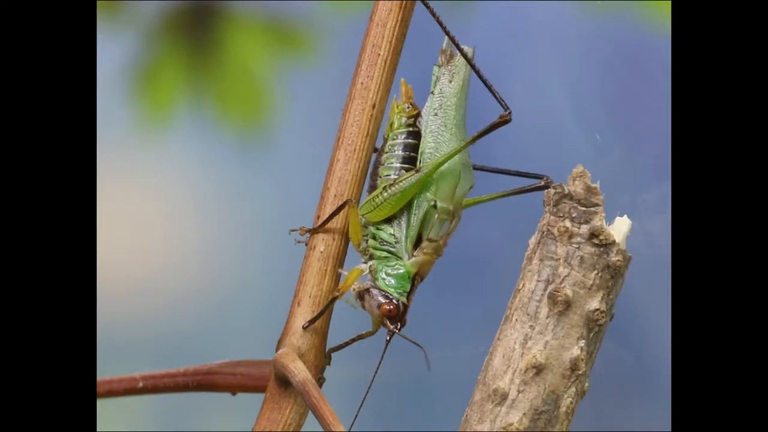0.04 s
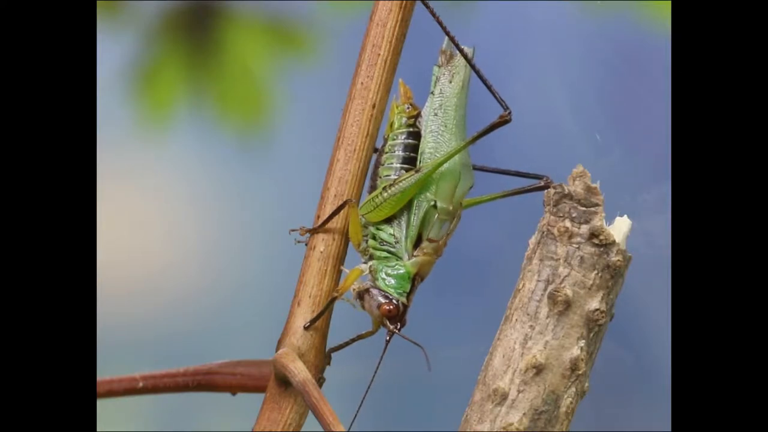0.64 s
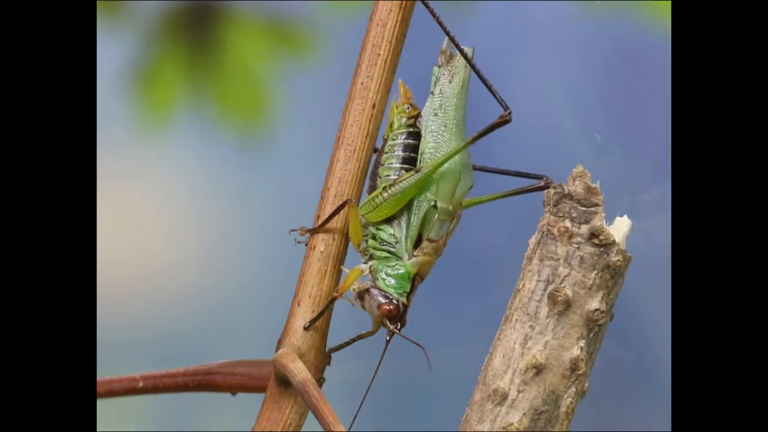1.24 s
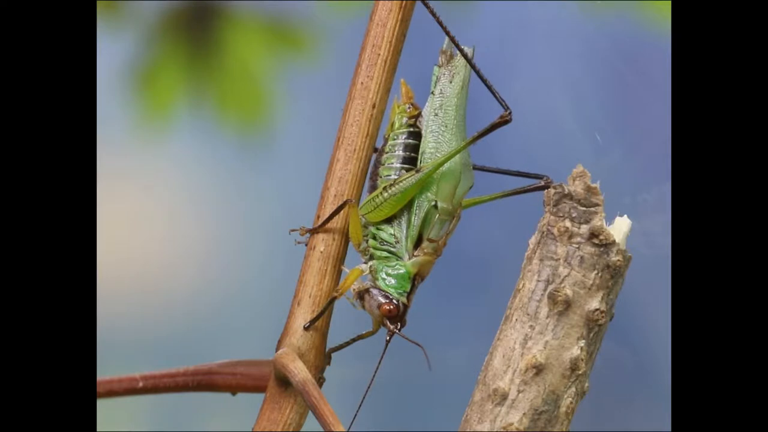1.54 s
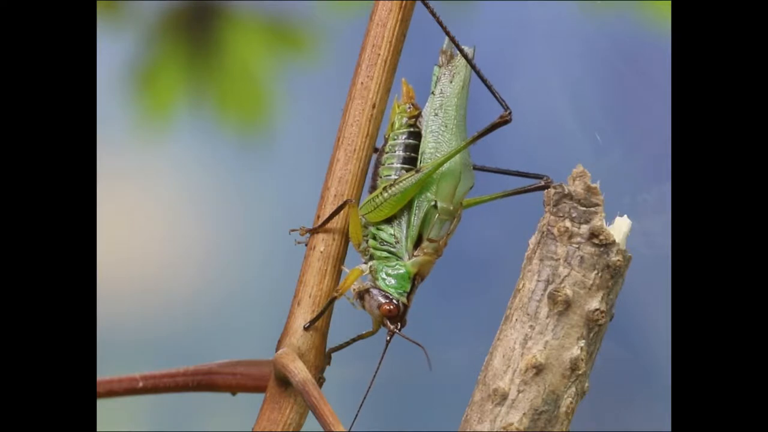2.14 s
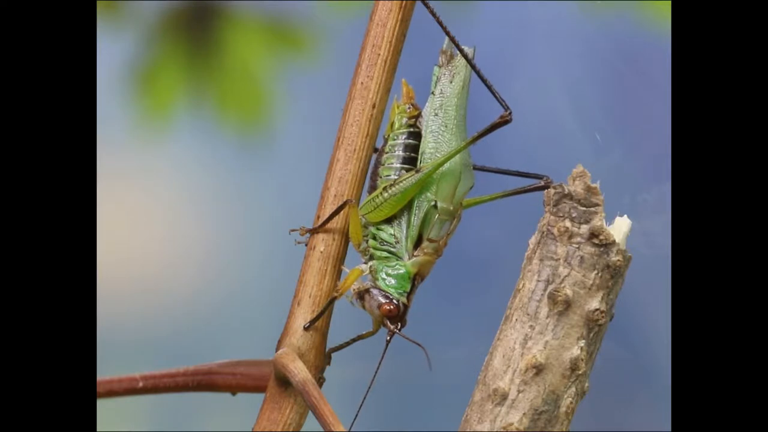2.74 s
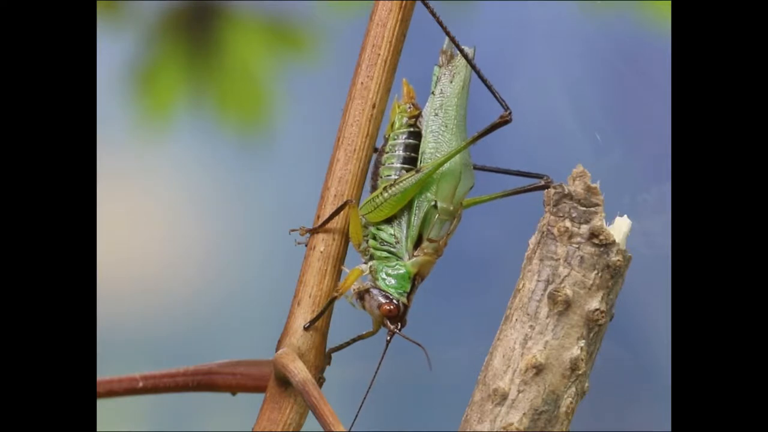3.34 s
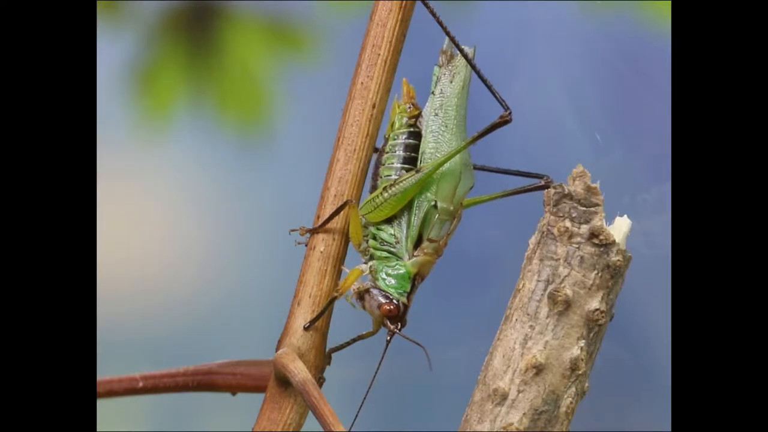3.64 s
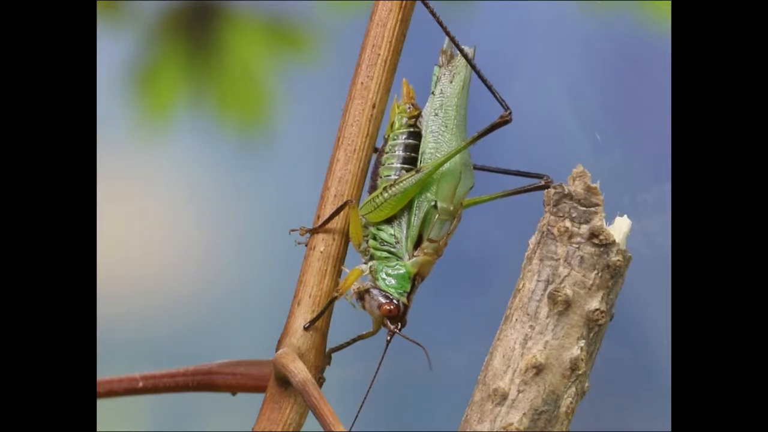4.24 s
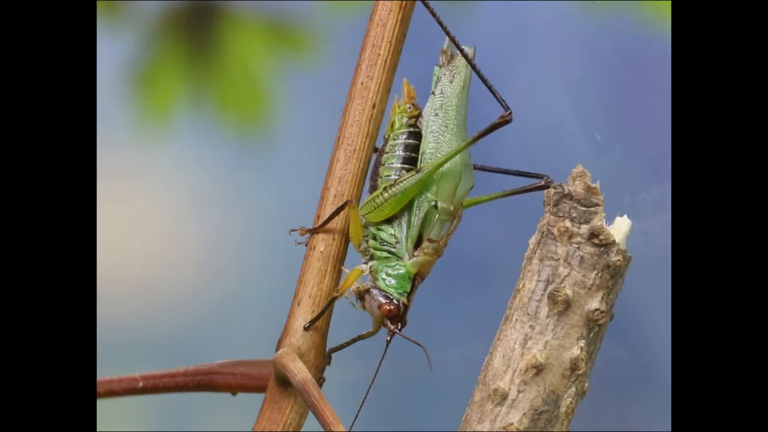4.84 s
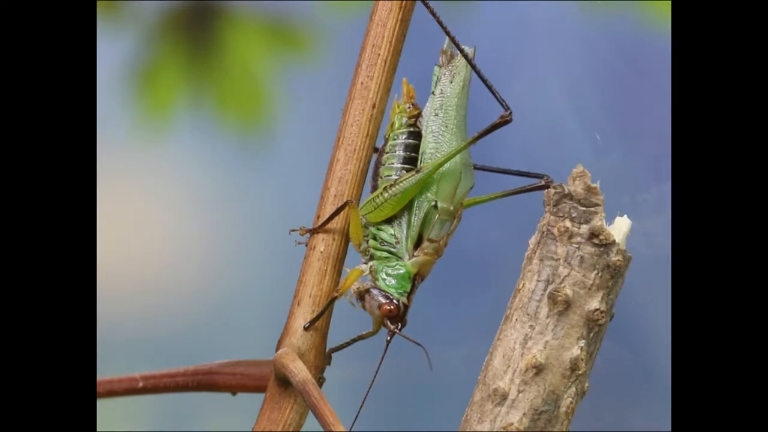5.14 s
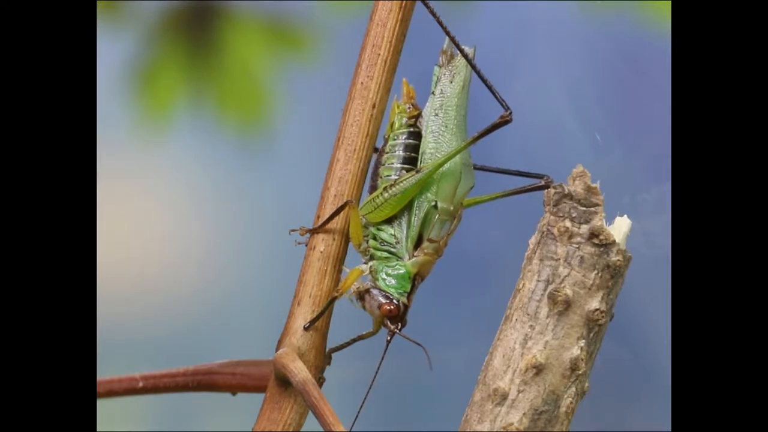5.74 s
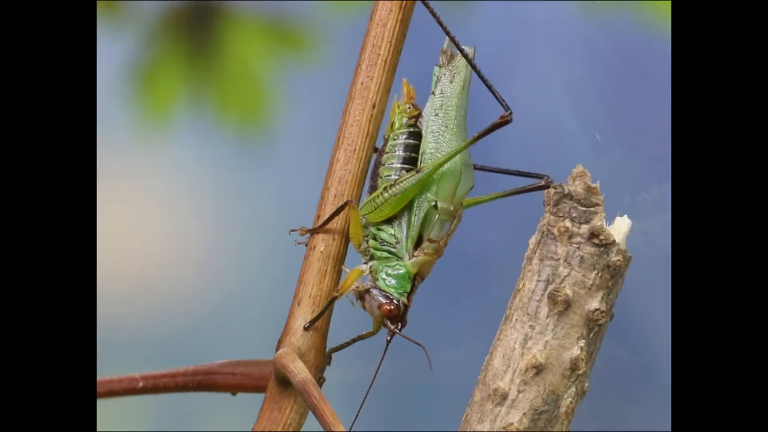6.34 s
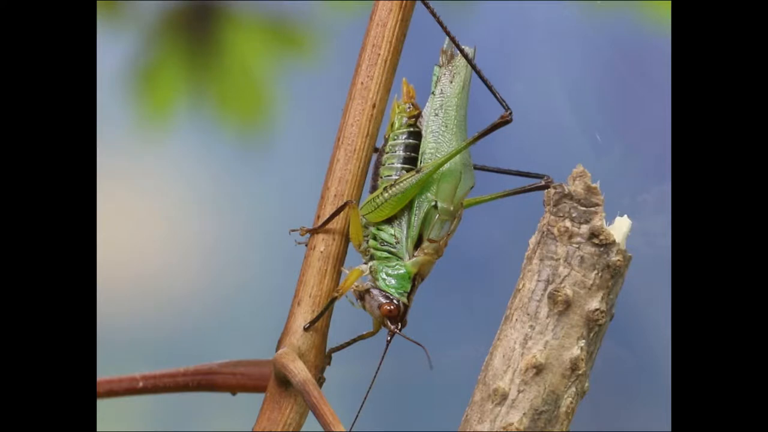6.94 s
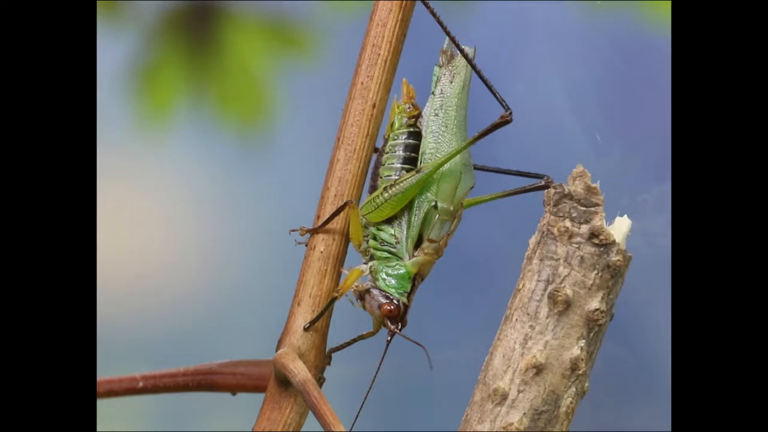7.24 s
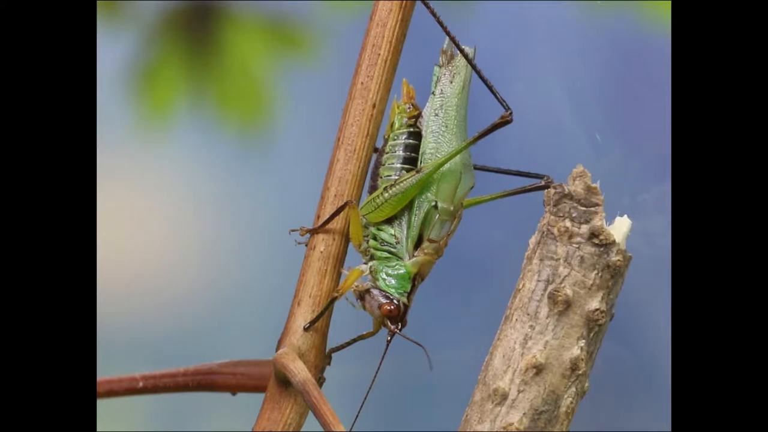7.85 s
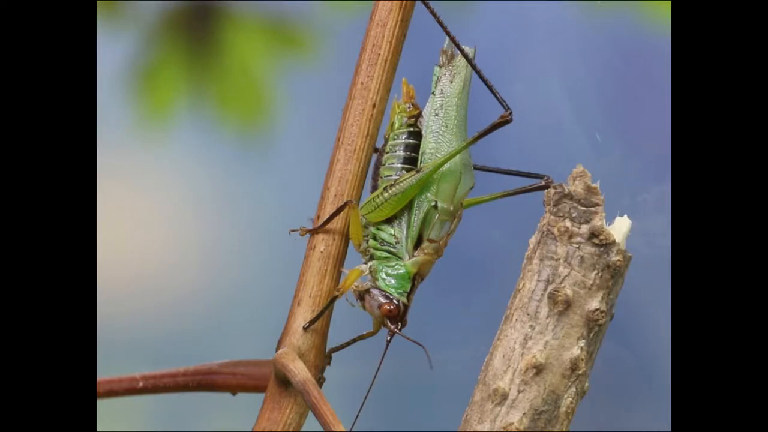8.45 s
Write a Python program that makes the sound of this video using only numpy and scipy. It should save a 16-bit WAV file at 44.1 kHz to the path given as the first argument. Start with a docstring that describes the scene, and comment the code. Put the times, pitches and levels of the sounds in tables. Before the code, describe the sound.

A close katydid makes a few sharp, irregular ticks over low outdoor hiss, then a fainter insect buzzes very high.

```python
"""Katydid ticks by stridulation

A katydid close by makes sharp ticks: in each quick wing stroke a scraper jumps over about ten file
teeth, exciting the wing's resonances. Hard surfaces nearby give each tick a short tail. Later a
fainter insect sings very high, short zips and two long buzzes. Steady hiss, rumble and a low machine
hum lie beneath, with brief low drones, a soft swish, a little rustling and one small knock."""
import sys
import numpy as np
from scipy import signal
from scipy.fft import rfft, irfft
from scipy.io import wavfile
from scipy.ndimage import uniform_filter1d

SR = 44100
rng = np.random.default_rng(int(sys.argv[2]) if len(sys.argv) > 2 else 0)


def unload_audio(sound):
    """Save the sound as a 16-bit wav file, at the path given as the first command line argument."""
    columns = np.transpose(np.atleast_2d(sound))
    # keep every value between -1 and 1, then stretch to whole-number steps
    steps = np.round(np.clip(columns, -1, 1) * 32767)
    wavfile.write(sys.argv[1], SR, steps.astype(np.int16))


N = 378819
T = np.arange(N) / SR


def amp(db):
    """Amplitude ratio of a level in decibels."""
    return 10 ** (np.asarray(db) / 20)


def unit(x):
    """Normalisation to rms 1."""
    return x / np.sqrt(np.mean(x ** 2) + 1e-20)


def read(points, hz):
    """Interpolation of a (frequency, value) table on a log-frequency axis."""
    f, value = np.transpose(points)
    return np.interp(np.log(hz + 1), np.log(f + 1), value)


def add(mix, s, sound):
    """Superposition of a sound at time s, which may lie before the start."""
    at = round(s * SR)
    sound = sound[max(-at, 0):]
    part = mix[max(at, 0):][:len(sound)]
    part += sound[:len(part)]


def noise(colour):
    """Spectral shaping of white noise, at rms 1."""
    gain = amp(read(colour, np.fft.rfftfreq(N, 1 / SR)))
    return unit(irfft(rfft(rng.standard_normal(N)) * gain, N))


def drift(seconds):
    """Random fluctuation of rms 1 with the given correlation time."""
    return unit(uniform_filter1d(rng.standard_normal(N), max(round(seconds * SR), 1)))


def swell(s, db, length):
    """Gaussian envelope that peaks at time s."""
    return amp(db) * np.exp(-(2 * (T - s) / length) ** 2)


# modes of the wing and its perch: f/Hz, width/Hz, relative level/dB
WING_MODES = [(4190, 340, -26), (5210, 190, -17.5), (5950, 150, -21), (6650, 200, -8.5), (7530, 610, -7.5),
              (8250, 220, -2), (9200, 390, -2), (9840, 300, -2), (10480, 410, -0.5), (11130, 450, 1.5),
              (11840, 350, 1), (12330, 360, 3.5), (13100, 400, 5), (14040, 250, -6), (14800, 300, -2),
              (15200, 400, -8)]
# radiation of the small wing, poor at low frequencies: f/Hz, gain/dB
WING_RADIATION = [(1000, -12), (2500, -0.5), (3300, -8), (4500, -9.5), (5700, -5), (6150, -6.5),
                  (6450, -2.5), (16000, 1.5)]


def wing(snap, tuning):
    """Impulse excitation: a snap is brief enough to strike all the wing's modes about equally."""
    hz, blow = np.fft.rfftfreq(len(snap), 1 / SR), rfft(snap)
    blow = blow / (abs(blow) + 1e-9) ** .75  # nearly flat spectrum
    power = sum(amp(db) ** 2 / (1 + (2 * (hz - tuning * centre) / width) ** 2) ** 1.4
                for centre, width, db in WING_MODES)
    log_gain = np.log(np.sqrt(power) * amp(read(WING_RADIATION, hz)))
    # minimum phase: the ringing follows the blow
    phase = -signal.hilbert(np.r_[log_gain, log_gain[-2:0:-1]]).imag[:len(hz)]
    return irfft(blow * np.exp(log_gain + 1j * phase))


def tick(length, tooth_hz, pitch, jitter=.11, uneven_db=0.6, fade_db=2.7, hardest=0.4,
         flex=0.01, slowing=.3, first_db=-2, size=4096):
    """Stridulation: the scraper catches lightly, then snaps over the teeth ever more slowly."""
    slip, force, bend = rng.standard_normal((40, 3)).T
    teeth = np.arange(len(slip))
    way = (teeth + jitter * slip * (teeth > 0)) / (tooth_hz * length)  # share of the file passed
    onsets = length * way * (1 + slowing * (way - 1))
    force_db = uneven_db * force - fade_db * (2 * (way - hardest)) ** 2 + first_db * (teeth == 0)
    tunings = pitch + flex * bend  # flexing detunes the wing
    t = np.arange(size) / SR
    # the scraper rattles for under a millisecond as it lands
    snaps = rng.standard_normal((len(slip), size)) * np.exp(-((t - .0009) / .00036) ** 4)
    stroke = np.zeros(size // 2)
    for s, db, snap, tuning in zip(onsets, force_db, snaps, tunings):
        if s < length:
            add(stroke, s, unit(wing(snap, tuning)) * amp(db))
    return stroke / np.sqrt(np.sum(stroke ** 2) / (length * SR))


# echoes from nearby surfaces: delay/s, gain/dB
ECHO_PATHS = [(.0034, -7.5), (.0062, -7.5), (.0095, -21), (.0128, -18), (.0165, -16), (.0195, -23.5)]


def reflections(scatter_db, decay_s):
    """Early reflection: an impulse response of direct sound, fine scatter and single echoes."""
    t = np.arange(SR // 10) / SR
    scatter = rng.standard_normal(len(t)) * np.exp(-t / decay_s)
    response = amp(scatter_db) * scatter / np.linalg.norm(scatter)
    response[0] += 1
    for delay, db in ECHO_PATHS:
        response[round(delay * SR)] += amp(db)
    return response


# spectrum of the diffuse echoes: f/Hz, relative level/dB
TAIL_SPECTRUM = [(3000, -58), (5800, -10.5), (6600, -6.5), (7400, -1.5), (8500, -2.5), (10000, 0.5),
                 (12300, -1), (13300, 1), (14000, 4), (15500, -5)]
# reverberation time of the surroundings: f/Hz, T60/s
TAIL_T60 = [(4000, 0.39), (7900, 0.29), (8200, 0.34), (8500, 0.3), (12000, 0.29), (16000, 0.23)]
# tones ringing in the surroundings: f/Hz, level/dB re the diffuse echoes, T60/s
TAIL_MODES = [(5180, -16, 0.094), (8195, -13, 0.26), (8755, -12, .29), (9500, -18, .27), (10300, -17, .26),
              (10490, -24, .4), (11070, -16, 0.284), (11290, -17, .2), (11665, -16, .27), (12230, -12, .24),
              (13070, -16, .22), (13372, -19, 0.21), (14085, -18, .2)]


def tail(rise_s=0.015, uneven_db=2.5, excite_db=3):
    """Reverberation: diffuse echoes build up, then decay treble first; thin tones ring within them."""
    hz, t, bands = signal.stft(rng.standard_normal(SR // 2), SR, nperseg=256)
    colour_db = read(TAIL_SPECTRUM, hz) + uneven_db * rng.standard_normal(len(hz))
    bands = bands * amp(colour_db[:, None] - 60 * t / read(TAIL_T60, hz)[:, None])
    ring = unit(signal.istft(bands, SR, nperseg=256)[1])
    t = np.arange(len(ring)) / SR
    for (tone_hz, db, t60), excitation in zip(TAIL_MODES, rng.standard_normal(len(TAIL_MODES))):
        tone = np.sin(2 * np.pi * (tone_hz * t + rng.random())) * amp(-60 * t / t60)
        ring += amp(db + excite_db * excitation) * unit(tone)
    ring *= 1 - np.exp(-t / rise_s)
    return ring / np.linalg.norm(ring)


# wing strokes: t/s, level/dB, duration/s, mean tooth rate/Hz, gain below 5.8 kHz/dB, pitch ratio
WING_STROKES = [(-0.043, -18, 0.016, 550, 0, 0.8), (0.1332, -18.5, 0.01, 730, 2.5, 0.97),
                (0.3394, -20, 0.013, 780, 2.5, 0.99), (0.532, -18, 0.011, 800, 1.5, 0.98),
                (0.7715, -18, 0.0135, 720, -4, 0.98), (1.4462, -20.5, 0.014, 800, -2, 0.96),
                (1.7140, -17.5, 0.011, 750, -2.5, 0.97)]


def katydid(tail_db=-18):
    """Multipath propagation: each tick arrives directly, by reflection and as a reverberant tail."""
    out = np.zeros(N)
    low_pass = signal.butter(8, 5800, fs=SR, output="sos")
    for s, db, length, tooth_hz, body_db, pitch in WING_STROKES:
        stroke = amp(db) * tick(length, tooth_hz, pitch)
        stroke += (amp(body_db) - 1) * signal.sosfiltfilt(low_pass, stroke)
        add(out, s, signal.fftconvolve(stroke, reflections(scatter_db=-11.5, decay_s=0.013)))
        add(out, s, amp(tail_db) * np.linalg.norm(stroke) * tail())
    return out


# hum lines and narrow resonances: f/Hz, width/Hz, rms level/dB
HUM_LINES = [(99.7, 3, -75), (119.3, 3, -65), (156.2, 2.2, -71), (162, 1, -63.5), (238, 4.5, -69.5),
             (304, 9.1, -69.5), (403, 7.7, -72.5), (627.3, 7.6, -69), (870, 56, -71), (1169, 22, -73.5),
             (1335, 4, -74), (1558, 35, -70), (1802, 37, -73.5), (2028, 63, -72), (3072, 7.8, -77.5),
             (3450, 2, -86.5)]


def machine_hum(pure_width_hz=9):
    """Line spectrum of a distant machine: the narrower a line, the steadier its tone."""
    hz, hum = np.fft.rfftfreq(N, 1 / SR), 0
    for centre_hz, width_hz, db in HUM_LINES:
        phases = np.exp(2j * np.pi * rng.random(len(hz)))
        band = unit(irfft(phases / (1 + (2 * (hz - centre_hz) / width_hz) ** 2), N))
        tone = np.sqrt(2) * np.sin(2 * np.pi * (centre_hz * T + rng.random()))
        steady = np.exp(-(width_hz / pure_width_hz) ** 2)  # the tone's share of the power
        hum += amp(db) * (np.sqrt(steady) * tone + np.sqrt(1 - steady) * band)
    return hum


# spectra of the steady rumble and of its deepest, surging part: f/Hz, relative level/dB
RUMBLE_SPECTRUM = [(20, -48), (40, -39), (60, -18.5), (80, -6.5), (120, 0), (150, -2), (195, -6),
                   (310, -2.5), (450, -11), (700, -13), (1200, -40)]
SURGE_SPECTRUM = [(12, -11), (25, -4.5), (45, -5), (65, 3), (85, -3), (130, -28)]


def rumble(steady_db=-58.5, surge_db=-79, depth_db=9, surge_s=.13):
    """Low-frequency noise: random modulation makes the deepest part well up several times a second."""
    surges = unit(noise(SURGE_SPECTRUM) * amp(depth_db * drift(surge_s)))
    return amp(steady_db) * noise(RUMBLE_SPECTRUM) + amp(surge_db) * surges


# spectrum of the hiss: f/Hz, relative level/dB
HISS_SPECTRUM = [(150, -15), (450, 1.5), (750, 0.5), (1050, -1), (1500, -1.5), (2100, -3.5), (3100, -6.5),
                 (4000, -11.5), (4800, -15), (7500, -14), (11000, -16.5), (16000, -21)]


def hiss(level_db=-55.5, waver_db=0.4, waver_s=0.061):
    """Broadband noise whose level wavers slightly."""
    return noise(HISS_SPECTRUM) * amp(level_db + waver_db * drift(waver_s))


# brief low drones: peak t/s, level/dB, duration/s, f/Hz
DRONE_TONES = [(0.255, -53.5, 0.054, 122), (1.405, -63, .16, 297.5), (3.068, -57.5, 0.057, 389),
               (4.303, -59, 0.099, 401), (4.294, -61, 0.14, 110), (6.01, -56.5, 0.057, 403)]


def drones():
    """Tone bursts: low sinusoids swell and fade within a moment."""
    return sum(swell(s, db, length) * np.sqrt(2) * np.sin(2 * np.pi * (hz * T + rng.random()))
               for s, db, length, hz in DRONE_TONES)


# the faint insect's zips: centre t/s, level/dB
ZIP_BURSTS = [(1.19, -66), (2.235, -65), (3.44, -66), (4.145, -64.5), (5.885, -67), (6.395, -65),
              (6.975, -64), (8.585, -65)]


def zip_envelope(length_s=0.048):
    """Gating: each zip is one short, flat-topped burst."""
    return sum(amp(db) * np.exp(-(2 * (T - s) / length_s) ** 4) for s, db in ZIP_BURSTS)


# its long buzzes: onset t/s, duration/s, level/dB, crescendo/(dB/s)
BUZZ_PHRASES = [(4.16, 1.36, -62, -0.5), (6.97, 1.23, -64.5, 2.5)]


def buzz_envelope(beat_hz=46.2, wander=.012, sharpness=2.6, attack_s=.1, release_s=.022,
                  flutter_db=1.0, flutter_s=.04):
    """Amplitude modulation by wing beats, which work up to full force, then stop quickly."""
    beats = np.cumsum(beat_hz * (1 + wander * drift(.05))) / SR
    puffs = np.exp(sharpness * (np.cos(2 * np.pi * beats) - 1))
    strokes = unit(1.2 + puffs)  # from far off, echoes fill most of the gap between beats
    force = 0
    for start, length, db, crescendo in BUZZ_PHRASES:
        held, after = np.clip(T - start, 0, length), np.maximum(T - start - length, 0)
        force += amp(db + crescendo * held) * (1 - np.exp(-held / attack_s)) * np.exp(-after / release_s)
    return strokes * force * amp(flutter_db * drift(flutter_s))


# spectrum of its rasp: f/Hz, relative level/dB
RASP_SPECTRUM = [(5000, -19), (8000, -7), (10500, -10), (11800, -5), (12400, -2), (12800, -3.5),
                 (13800, 1.5), (14600, 1), (15300, 3.5), (16200, -6)]


def faint_insect():
    """Modulated noise: the wings' very high rasp is the carrier of both zips and buzzes."""
    return (zip_envelope() + buzz_envelope()) * noise(RASP_SPECTRUM)


# spectrum of the swish: f/Hz, relative level/dB
SWISH_SPECTRUM = [(1500, -8), (4000, -2), (6000, -1), (8000, 0), (11000, -5), (15000, -15)]


def swish(peak_s=2.545, level_db=-56.5, length_s=0.2):
    """High-frequency noise under a single smooth envelope."""
    return swell(peak_s, level_db, length_s) * noise(SWISH_SPECTRUM)


# soft rustles: peak t/s, level/dB, duration/s
RUSTLE_SWELLS = [(4.713, -58.5, .11), (7.993, -60, .1), (8.264, -56.5, 0.41), (8.505, -68, 0.046)]
# their spectrum: f/Hz, relative level/dB
RUSTLE_SPECTRUM = [(200, -12), (700, 0.5), (1700, 2.5), (3300, -3), (4500, -8.5), (6000, -11.5),
                   (12000, -17)]


def rustles():
    """Mid-frequency noise under a few smooth envelopes."""
    return sum(swell(*row) for row in RUSTLE_SWELLS) * noise(RUSTLE_SPECTRUM)


# spectrum of the knock: f/Hz, relative level/dB
KNOCK_SPECTRUM = [(200, -10), (750, -12), (1050, -7), (1500, 8), (2000, 3.5), (2400, -3), (3100, 0),
                  (3900, -9), (4500, -3), (5500, -17), (12000, -32)]


def knock(onset_s=7.9635, level_db=-44.5, decay_s=0.0056):
    """Heavily damped impact: a light blow some way off, too dull to ring, and its reflections."""
    t = np.arange(SR // 8) / SR
    blow = noise(KNOCK_SPECTRUM)[:len(t)] * np.exp(-t / decay_s)
    blow /= np.sqrt(np.sum(blow ** 2) / (decay_s * SR))
    out = np.zeros(N)
    add(out, onset_s, amp(level_db) * signal.fftconvolve(blow, reflections(scatter_db=1, decay_s=0.03)))
    return out


def scene():
    """Superposition of all sources at one microphone."""
    return (katydid() + machine_hum() + rumble() + hiss() + drones()
            + faint_insect() + swish() + rustles() + knock())[None]


def record(dry, ceiling_db=-8.5, cutoff_hz=15850):
    """Soft saturation rounds the sharpest snaps at the input's ceiling; a low-pass limits the band."""
    fine = signal.resample_poly(dry, 2, 1, axis=1)  # oversampling, so the rounding adds no low notes
    rounded = fine / (1 + (fine / amp(ceiling_db)) ** 6) ** (1 / 6)
    low_pass = signal.firwin(511, cutoff_hz, window=("kaiser", 9), fs=SR)
    return signal.oaconvolve(signal.resample_poly(rounded, 1, 2, axis=1), low_pass[None], "same")


dry = scene()
out = record(dry)
unload_audio(out)
```